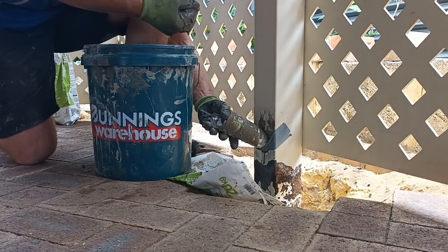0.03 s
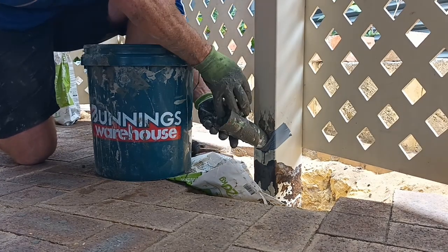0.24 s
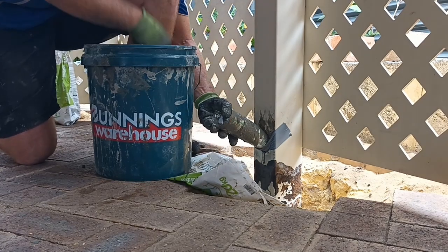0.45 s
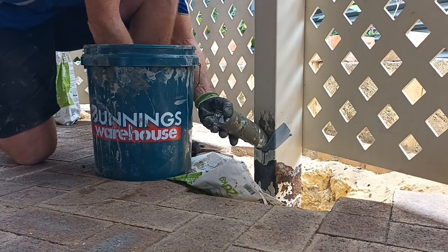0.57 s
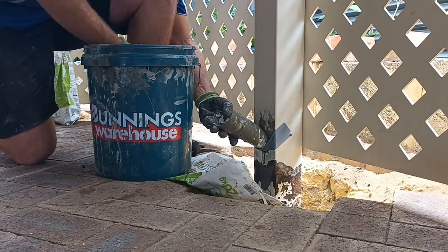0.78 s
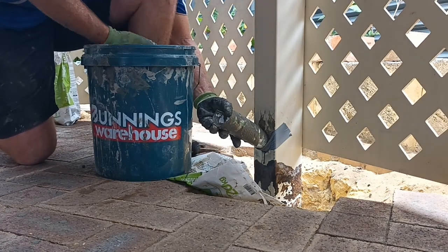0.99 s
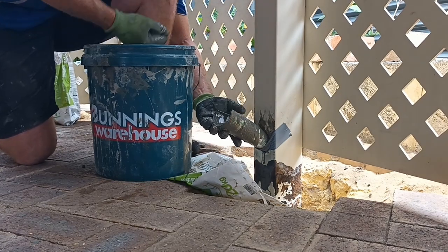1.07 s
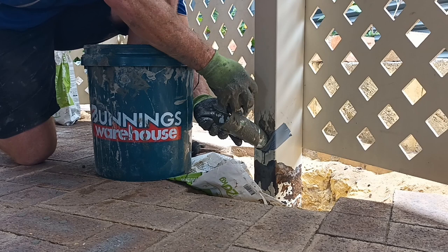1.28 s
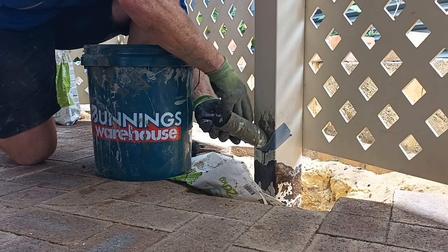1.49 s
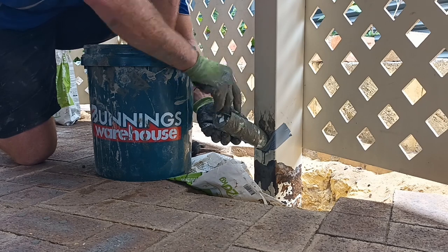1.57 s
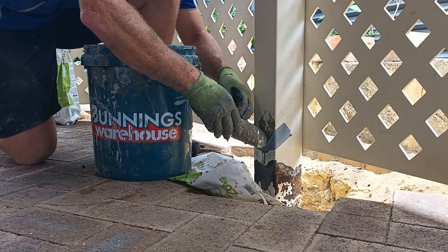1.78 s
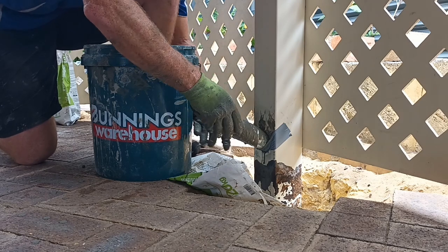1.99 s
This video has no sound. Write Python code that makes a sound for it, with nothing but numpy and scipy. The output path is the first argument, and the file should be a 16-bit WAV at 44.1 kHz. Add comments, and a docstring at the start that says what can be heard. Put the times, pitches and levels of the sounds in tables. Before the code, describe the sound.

Wet, gritty mix squelches softly as a gloved hand packs it into a post base.

```python
"""Packing wet mix into a post base

Gloved hands pack wet, gritty mix from a plastic bucket into a steel post base on a paved patio.
Two handfuls go in with a fizzing squelch that rings the steel, while trapped air spits and plops.
Between them the hand digs in the bucket, bumps its wall and rubs through the grit. Textures are clouds
of tiny grains, air pockets are short falling tones, and a faint low hum lies under the outdoor air."""
import sys
import numpy as np
from scipy import signal
from scipy.fft import rfft, irfft
from scipy.io import wavfile

SR = 44100
rng = np.random.default_rng(int(sys.argv[2]) if len(sys.argv) > 2 else 0)


def store_wav(level_fs):
    """Save 16-bit WAV to argv[1]."""
    pcm = np.round(np.clip(np.atleast_2d(level_fs), -1, 1) * 32767)
    wavfile.write(sys.argv[1], SR, pcm.T.astype(np.int16))


N = 90404
TIME = np.arange(N) / SR

# Stereo image, narrow in the bass and wide on top: (frequency [Hz], left-right correlation [0-1])
STEREO_IMAGE = [(100, 0.89), (330, 0.62), (700, 0.26), (1400, 0.0076)]
# Tone of the outdoor air bed: (frequency [Hz], relative level [dB])
AIR_EQ = [(25, -18), (100, -0.5), (1200, -11), (3000, -15), (8300, -24.5), (10700, -12.5), (13300, -25),
          (15500, -17)]
# Dull tone of loose, wet mush: (frequency [Hz], relative level [dB])
MUSH_EQ = [(88, -58), (150, -13), (254, -7), (1330, -11.5), (5850, -22), (8150, -36), (9900, -41),
           (15800, -34.5)]
# The hand digs into the bucket: (peak time [s], level [dB], rise [s], fall [s])
DIGS = [(.533, -47, 0.0031, 0.022), (.55, -41.5, 0.012, 0.012), (.582, -47.5, 0.024, 0.037),
        (.695, -58.5, 0.022, 0.031)]
# The bucket wall booms: (time [s], level [dB])
WALL_BUMPS = [(.532, -39.5), (.592, -44.5)]
# Bright, scratchy tone of sand: (frequency [Hz], relative level [dB])
GRIT_EQ = [(900, -8), (1500, -7.5), (2800, -11.5), (4700, -1.5), (8200, -9), (10700, 2.5), (13300, -17),
           (15300, -9.5)]
# Fader ride for sand rubbing on the glove: (time [s], relative level [dB])
RUB_FADER = [(0.3, -77), (0.44, -68.5), (0.51, -57), (0.66, -64.5), (0.76, -70.5), (0.88, -69.5),
             (1.03, -71.5), (1.08, -77), (1.3, -95), (1.5, -59.5), (1.64, -64.5), (1.75, -73), (1.95, -84)]
# Short crunches of grit: (peak time [s], level [dB], fall [s])
CRUNCHES = [(0.038, -63, 0.0034), (0.0865, -55, 0.0083), (0.32, -40, .014), (0.482, -55, 0.018),
            (0.751, -56.5, 0.023), (0.799, -54.5, 0.0056), (.829, -53, 0.0055), (0.958, -57, 0.0055),
            (0.982, -57, 0.0048), (1.018, -55.5, 0.014), (1.043, -59, 0.0047), (1.23, -58.5, 0.0028),
            (1.733, -61, 0.0035), (1.857, -54, .012), (0.924, -60.5, 0.013), (2.004, -60, .011)]
# Thin, hissy tone of escaping air: (frequency [Hz], relative level [dB])
SPIT_EQ = [(3500, -25), (6800, -3.5), (8300, -23), (10600, 0.5), (13500, -21), (15300, -23)]
# Air spits out of the wet mix: (peak time [s], level [dB], half length [s])
SPITS = [(.2445, -30.5, 0.0006), (1.459, -49.5, .0036), (1.487, -37, 0.0034), (1.495, -39.5, 0.0047)]
# Larger beads of wet mix burst with a ping: (time [s], level [dB], pitch [Hz])
BEAD_PINGS = [(.824, -48, 4580), (1.007, -55, 4620), (1.595, -53, 6820), (1.627, -49.5, 6760)]
# Wet channels whistle under the squeeze: (peak time [s], level [dB], pitch [Hz])
GURGLES = [(0.355, -48, 2060), (1.464, -50.5, 2010), (1.493, -51.5, 2020)]
# The glove peels off the mix: (time [s], level [dB], starting pitch [Hz], 60 dB decay [s])
SQUISHES = [(1.301, -48.5, 902, 0.12), (1.363, -33, 1030, 0.023), (1.466, -37, 1060, 0.028),
            (1.8454, -41.5, 1028, 0.066), (1.996, -52, 904, 0.071)]
# Air pockets pop: (time [s], level [dB], starting pitch [Hz], 60 dB decay [s])
PLOPS = [(0.309, -33, 507, 0.025), (0.313, -36, 362, .044), (0.3514, -17, 448, 0.012),
         (.358, -39, 276, 0.026), (.542, -33, 273, 0.033), (.844, -54.5, 1170, .07),
         (1.271, -44.5, 735, 0.025), (1.429, -33, 366, 0.042), (1.453, -31.5, 388, 0.035),
         (1.589, -45, 586, 0.022)]
# Resonances of the steel post base: (frequency [Hz], bandwidth [Hz], gain [dB])
POST_MODES = [(1157, 75, -6), (1306, 6.7, -9), (1850, 11, -11), (3320, 91, -5), (4288, 5.7, 1)]
# Fizzy tone of squeezed mix: (frequency [Hz], relative level [dB])
SQUELCH_EQ = [(180, -43), (300, -19.5), (411, -25.5), (723, -0.5), (974, -3.5), (1250, -3.5), (1890, -1.5),
              (2680, -5), (4630, -2), (8410, -15), (10400, -8.5), (13200, -26.5), (15800, -15)]
# Each shove squeezes the mix: (peak time [s], level [dB], rise [s], fall [s])
SHOVES = [(.227, -45, 0.0014, 0.018), (.268, -32.5, 0.022, 0.02), (.319, -36.5, 0.0053, 0.0052),
          (.355, -40.5, 0.013, 0.015), (.416, -56.5, 0.0074, 0.032), (1.332, -56.5, 0.02, 0.035),
          (1.377, -35, 0.015, 0.018), (1.425, -47, 0.013, 0.053), (1.491, -44, 0.0079, 0.036)]

MUSH_GRAINS = dict(eq=MUSH_EQ, per_s=7000, spread_db=0)
SQUELCH_GRAINS = dict(eq=SQUELCH_EQ, per_s=16000, spread_db=2)


def from_db(db):
    """Decibels to gain."""
    return 10 ** (np.asarray(db) / 20)


def rms_one(x):
    """Scale to an rms of 1."""
    return x / np.sqrt(np.mean(x ** 2) + 1e-20)


def at_hz(points, hz):
    """Read a curve on a log-frequency axis."""
    frequencies, values = np.transpose(points)
    return np.interp(np.log(hz + 1), np.log(frequencies), values)


def fader(curve):
    """Gain ride through (time [s], level [dB]) points; silent outside them."""
    times, db = np.transpose(curve)
    return from_db(np.interp(TIME, times, db, left=-140, right=-140))


def swells(rows):
    """Envelope of brief bell-shaped swells, summed in power."""
    return np.sqrt(sum(from_db(2 * db) * np.exp(-((TIME - s) / half) ** 2) for s, db, half in rows))


def strokes(rows):
    """Envelope of hand strokes that swell smoothly and die away, summed in power."""
    power = np.zeros(N)
    for s, db, rise, fall in rows:
        age = TIME - s
        power += from_db(2 * db) * np.exp(-np.where(age < 0, (age / rise) ** 2, 2 * age / fall))
    return np.sqrt(power)


def decay(start, t60):
    """Envelope with a soft attack, slower for longer rings, and an exponential tail."""
    progress = np.maximum(TIME - start, 0) / t60
    attack = 1 - np.exp(-(progress / 0.088) ** 2)
    return attack * np.exp(-np.log(1000) * np.minimum(progress, 10))


def wander(hz):
    """Smooth random modulation up to about this rate; rms 1."""
    return rms_one(signal.sosfilt(signal.butter(2, hz, fs=SR, output="sos"), rng.standard_normal(N)))


def resonance(x, hz, width_hz):
    """A two-pole band-pass with unity gain at its peak."""
    radius = np.exp(-np.pi * width_hz / SR)
    feedforward = np.array([1, 0, -1]) * (1 - radius ** 2) / 2
    feedback = [1, -2 * radius * np.cos(2 * np.pi * hz / SR), radius ** 2]
    return signal.lfilter(feedforward, feedback, x + 1e-18)


def ring(start, hz, t60, sag_per_s=0):
    """A dying tone; with sag, its pitch sinks as its cavity opens."""
    age = np.maximum(TIME - start, 0)
    pitch = (age > 0) * hz / (1 + sag_per_s * age)
    return decay(start, t60) * np.sin(2 * np.pi * np.cumsum(pitch) / SR)


def colour(pair, eq):
    """EQ two unrelated signals and blend them as mid and side into the stereo image; rms 1."""
    hz = np.arange(N // 2 + 1) * SR / N
    mid, side = rfft(pair) * from_db(at_hz(eq, hz))
    alike = np.clip(at_hz(STEREO_IMAGE, hz), -1, 1)
    return rms_one(irfft(np.sqrt(1 + alike) * mid + np.sqrt(1 - alike) * side * [[1], [-1]], N))


def grains(eq, per_s, spread_db):
    """A dense stereo cloud of tiny bursts of uneven size; rms 1."""
    onsets = rng.random(N) < per_s / SR
    sizes = from_db(spread_db * np.minimum(rng.exponential(1, N), 4))
    return colour(onsets * sizes * rng.standard_normal((2, N)), eq)


def clumps(x, bands=18, depth_db=2.6, rate_hz=55):
    """Lumps of wet sand make each narrow band swell and fade on its own; rms 1."""
    hz = np.arange(N // 2 + 1) * SR / N
    position = at_hz([(500, 0), (12000, bands - 1)], hz)
    spectrum = rfft(x)
    layers = (irfft(spectrum * np.maximum(1 - np.abs(position - k), 0), N) for k in range(bands))
    return rms_one(sum(layer * from_db(depth_db * wander(rate_hz)) for layer in layers))


def outdoors(hum_hz=100.1, width_hz=13.7):
    """The bed: quiet air and a distant, wavering hum."""
    hum = resonance(rng.standard_normal(N), hum_hz, width_hz)
    hum = rms_one(resonance(hum, hum_hz, width_hz))
    air = colour(rng.standard_normal((2, N)), AIR_EQ)
    return from_db(-71) * air + from_db(-79.5) * hum


def patio(x):
    """Short, dull reflections scatter off the paving and the lattice fence."""
    scatter = colour(rng.standard_normal((2, N)), eq=[(100, 0), (6400, 0), (16000, -8)])
    impulse = rms_one(scatter * decay(start=0.011, t60=0.063)) / np.sqrt(N)
    return from_db(-24) * signal.fftconvolve(x, impulse, axes=1)[:, :N]


def bubbles(voices=24, low_hz=2090, high_hz=7200, per_s=240, t60=0.04):
    """Fine bubbles ping at random wherever the wet grit is rubbed."""
    pops = (rng.random(N) < per_s / SR) * rng.standard_normal((2, N))
    voice = rng.integers(0, voices, N)
    rubbing = fader(RUB_FADER)
    pitches = np.geomspace(low_hz, high_hz, voices) * rng.normal(1, 0.02, voices)
    width_hz = np.log(1000) / np.pi / t60
    pings = sum(resonance(pops * rubbing * (voice == k), hz, width_hz) for k, hz in enumerate(pitches))
    return from_db(-4) * np.sqrt(np.mean(rubbing ** 2)) * rms_one(pings)


def beads():
    """Larger wet beads burst, each with a high, steady ping."""
    return sum(from_db(db) * ring(s, hz, t60=0.046) for s, db, hz in BEAD_PINGS)


def grit():
    """Sand rubs unevenly on the glove; stones crunch and ring as they grind."""
    rubbing = fader(RUB_FADER) * from_db(2.8 + 1.6 * wander(hz=66.6))
    sand = clumps(grains(GRIT_EQ, per_s=11000, spread_db=0.5))
    crunching = strokes([(s, db, 0.55 * fall, fall) for s, db, fall in CRUNCHES])
    stones = sum(resonance(sand * crunching, hz, width_hz=255) for hz in (2780, 3345))
    return sand * np.hypot(rubbing, crunching) + from_db(5) * stones


def tick(time_s=1.1992, hz=2997, width_s=0.00038):
    """One sharp accent: a chirp of only a few cycles with a thin, gritty snap."""
    age = TIME - time_s
    chirp = np.exp(-0.5 * (age / width_s) ** 2) * np.cos(2 * np.pi * hz * age)
    snap = rms_one(resonance(grains(**SQUELCH_GRAINS), hz, width_hz=hz / 2))
    return from_db(-30.5) * chirp + from_db(-39.5) * snap * decay(time_s - width_s, t60=0.015)


def bucket():
    """The hand digs into the mush, a little to the right, and bumps a boom from the plastic wall."""
    pan = from_db([[-1.5], [1.5]])
    mush = clumps(grains(**MUSH_GRAINS)) * strokes(DIGS)
    booms = sum(from_db(db) * ring(s, hz=232.2, t60=0.16) for s, db in WALL_BUMPS)
    return pan * mush + booms


def spits():
    """Air escapes the wet mix in tiny, bright bursts."""
    return grains(SPIT_EQ, per_s=20000, spread_db=1.5) * swells(SPITS)


def gurgles(half_length_s=0.006):
    """Air forced through wet channels gives short, breathy whistles."""
    whistles = np.zeros((2, N))
    for s, db, hz in GURGLES:
        breath = rms_one(resonance(rng.standard_normal((2, N)), hz, width_hz=120))
        whistles += breath * swells([(s, db, half_length_s)])
    return whistles


def squishes(sag_per_s=11.17, overtone_ratio=1.7, wobble_s=0.00012, roughness=0.55):
    """Two rough, falling cavity tones as the glove peels away; the upper one dies first."""
    tones = np.zeros(N)
    for s, db, hz, t60 in SQUISHES:
        lower = ring(s, hz, t60, sag_per_s)
        upper = ring(s, hz * overtone_ratio, t60 / overtone_ratio, sag_per_s)
        tones += from_db(db) * (lower + from_db(-2.5) * upper)
    sides = []
    for _ in range(2):   # left and right each get their own pitch and level flutter
        wobbled = np.interp(TIME + wobble_s * wander(hz=145), TIME, tones)
        sides.append(wobbled * (1 + roughness * wander(hz=211)))
    return np.array(sides)


def plops():
    """Each air pocket pops with a short, sinking note and throws a little splash."""
    splash = from_db(-8) * grains(**MUSH_GRAINS)
    return sum(from_db(db) * (ring(s, hz, t60, sag_per_s=2.5) + splash * decay(s, t60))
               for s, db, hz, t60 in PLOPS)


def squelch():
    """The lead sound: wet mix fizzes under each shove and sets the steel post base ringing."""
    fizz = clumps(grains(**SQUELCH_GRAINS)) * strokes(SHOVES)
    steel = sum(from_db(db) * resonance(fizz, hz, width) for hz, width, db in POST_MODES)
    return fizz + steel


def scene(low_cut_hz=225):
    """The mixdown: close handwork, too small to radiate bass, with its reflections over the air bed."""
    work = squelch() + gurgles() + bucket() + grit() + spits()
    work += bubbles() + plops() + beads() + squishes()
    work = signal.sosfilt(signal.butter(4, low_cut_hz, "high", fs=SR, output="sos"), work)
    return work + patio(work) + tick() + outdoors()


def record(dry):
    """A steep high cut takes off the very top."""
    high_cut_hz = 15850
    return signal.sosfilt(signal.ellip(12, 0.2, 80, high_cut_hz, fs=SR, output="sos"), dry)


dry = scene()
out = record(dry)
store_wav(out)
```